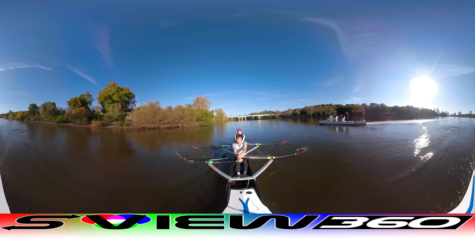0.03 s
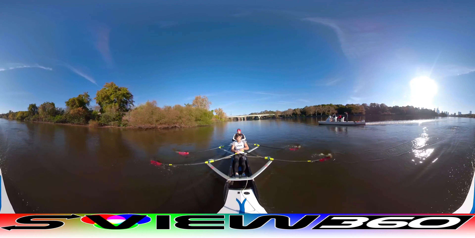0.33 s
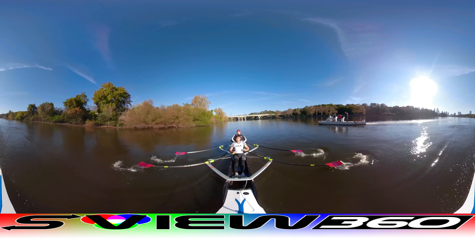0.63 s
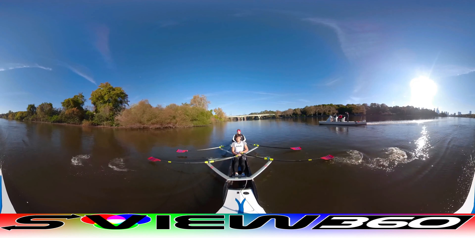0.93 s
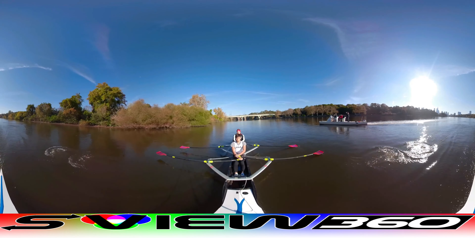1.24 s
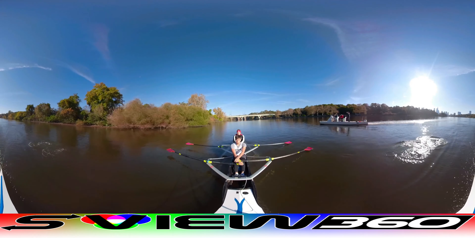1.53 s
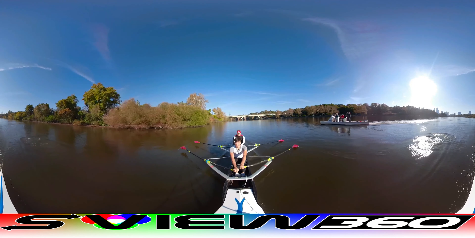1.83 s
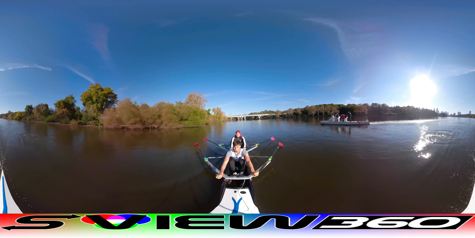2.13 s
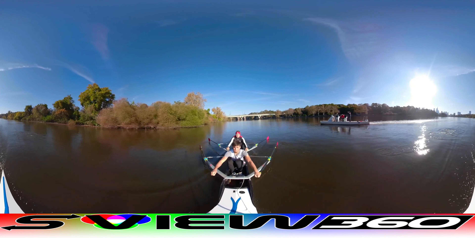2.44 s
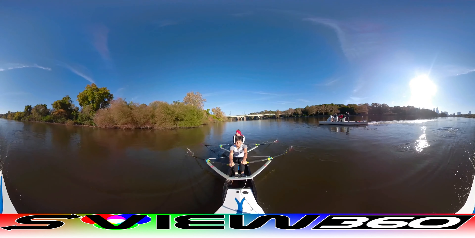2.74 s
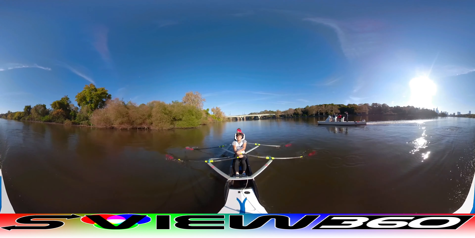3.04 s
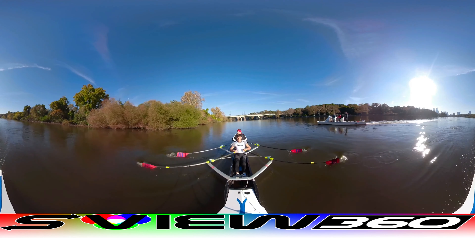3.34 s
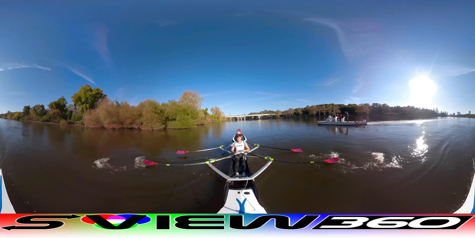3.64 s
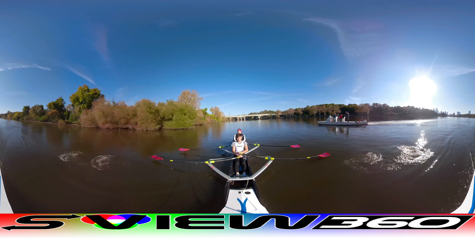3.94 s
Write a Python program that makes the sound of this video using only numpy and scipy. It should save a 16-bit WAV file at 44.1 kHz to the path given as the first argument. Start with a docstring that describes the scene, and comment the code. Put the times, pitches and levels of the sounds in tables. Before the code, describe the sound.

Oars splashing in calm water as a rowing boat glides, with wind rumbling on the microphone.

```python
"""A sculling boat on calm water, heard from its deck. First the blades splash out of the water and
leave fizzing foam. Then the boat glides: drops fall from the blades, and water washes and glugs along
the hull. Near 2.7 s the blades splash in, and about a second later they come out again. All along,
moving air rumbles and thumps on the microphone, at times overloading it."""
import sys
import numpy as np
from scipy import signal
from scipy.fft import rfft, irfft
from scipy.io import wavfile
from scipy.ndimage import uniform_filter1d

SR = 44100
rng = np.random.default_rng(int(sys.argv[2]) if len(sys.argv) > 2 else 0)


def store_wav(level_fs):
    """Save 16-bit WAV to argv[1]."""
    pcm = np.round(np.clip(np.atleast_2d(level_fs), -1, 1) * 32767)
    wavfile.write(sys.argv[1], SR, pcm.T.astype(np.int16))


N = 176400
TIME = np.arange(N) / SR


# The bright tone of spray, also used for drops, foam and mist: (frequency [Hz], level [dB])
SPRAY_TONE = [(700, -23.5), (2300, 2), (4100, -4.5), (5600, 3), (6400, -2.5), (7400, -2), (8700, -17),
              (10400, -8.5), (12200, -13.5), (15500, -23)]
# The darker tone of sloshing water: (frequency [Hz], level [dB])
SLOSH_TONE = [(400, 10.5), (2400, -6), (3500, -12), (12000, -28)]
# Splashes from the blades: (time [s], level [dB], fade time [s], slosh compared with spray [dB])
BLADE_SPLASHES = [(.516, -47, .018, 5), (.686, -29, 0.013, -5), (0.701, -42.5, 0.017, 13),
                  (0.737, -36.5, 0.021, 4), (0.761, -24.5, 0.019, -3), (.806, -35, 0.018, -6),
                  (2.541, -42, 0.009, 16), (2.641, -37.5, 0.014, -3), (2.663, -34, 0.008, -2),
                  (2.676, -34, 0.014, -3), (2.691, -27.5, 0.005, -3), (2.72, -24.5, 0.0026, -3),
                  (3.519, -40, 0.012, -5), (3.571, -31.5, 0.0058, -7), (3.587, -39, 0.011, 12),
                  (3.642, -34.5, 0.021, -8)]

def splashes():
    """Water thrown by the blades lands as a bright, grainy burst with a slosh of larger bubbles."""
    spray_gain, slosh_gain = np.zeros((2, N))
    for start, db, fade_s, slosh_db in BLADE_SPLASHES:
        landing = from_db(db) * burst(start, rise_s=0.39 * fade_s, fade_s=fade_s)
        spray_gain += landing
        slosh_gain += landing * from_db(slosh_db)
    grain = rng.standard_normal(N) * from_db(3.5 * drift(rate_hz=352))
    slosh = bubbles(per_s=2200, spread_db=1.0, cycles=47, pitches_hz=np.geomspace(350, 4000, 36))
    patter = colour(grain, SPRAY_TONE)
    brighter = colour(patter, [(8500, 0), (10500, 3.5)])  # more of the finest spray
    blades_entering = abs(TIME - 2.68) < 0.1
    patter = np.where(blades_entering, brighter, patter)
    return spray_gain * patter + slosh_gain * colour(slosh, SLOSH_TONE)


# Drops falling from the blades: (time [s], patter level [dB], bubble pitch [Hz])
BLADE_DROPS = [(0.301, -45, 5520), (0.377, -47.5, 5340), (1.173, -47, 3130), (1.289, -40.5, 4910),
               (1.4, -44.5, 2520), (1.461, -43.5, 5860), (1.737, -45, 5700), (1.757, -40, 3460),
               (1.79, -47.5, 5600)]

def drops():
    """Each drop patters on the water and stirs up a bubble that rings at a wobbly pitch."""
    patter, out = noise(SPRAY_TONE), np.zeros(N)
    wobble = 1 + 0.05 * drift(rate_hz=600)
    for start, db, hz in BLADE_DROPS:
        impact = patter * burst(start, rise_s=0.001, fade_s=0.01)
        ring = sine(hz * wobble) * burst(start, rise_s=0.001, fade_s=24 / hz)
        out += from_db(db) * (impact + from_db(7) * ring)
    return out


# The tone of water along the hull: (frequency [Hz], level [dB])
WASH_TONE = [(150, -24), (420, 5), (1400, 2), (2800, -15.5), (12000, -47)]
# How loud that water is: (time [s], level [dB])
WASH_LEVELS = [(.06, -46.5), (.47, -46.5), (.69, -38.5), (1.0, -47.5), (1.65, -43), (2.45, -40.5),
               (3.02, -49.5), (3.42, -50), (3.65, -41), (4.0, -55)]

def wash():
    """Water rushes along the hull, growing louder as the boat glides between strokes."""
    return level(WASH_LEVELS) * noise(WASH_TONE) * from_db(drift(rate_hz=40))


# Hollow glugs under the hull: (time of the peak [s], level [dB], pitch [Hz])
HULL_GLUGS = [(.54, -22, 166), (.966, -9, 152.3), (1.25, -17, 157.4), (1.835, -14.5, 180),
              (1.96, -19.5, 171.5), (2.06, -20, 191.9), (2.215, -18.5, 178.7), (2.35, -17, 185.8)]

def glugs():
    """Pockets of air trapped under the hull ring at a low, wobbly pitch."""
    wobble, out = 1 + 0.16 * drift(rate_hz=91.3), np.zeros(N)
    for peak_s, db, hz in HULL_GLUGS:
        ring = np.sqrt(2) * sine(hz * wobble)  # average level (rms) of 1
        out += from_db(db) * hump(peak_s, half_width_s=0.02) * ring
    return out


# How loud the foam is; the trickle follows it too: (time [s], level [dB])
FOAM_LEVELS = [(.06, -53), (.47, -59.5), (.56, -51), (.78, -47.5), (1.02, -55.5), (1.12, -58), (2.0, -57),
               (2.3, -54.5), (2.72, -54.5), (2.96, -61), (3.28, -64.5), (3.46, -55.5), (3.6, -48.5),
               (3.77, -50), (3.97, -64.5)]

def foam():
    """Many tiny bubbles crackle over a fine hiss."""
    fizz = bubbles(per_s=1500, spread_db=6, cycles=9, pitches_hz=np.geomspace(1800, 14000, 28))
    crackle = from_db(-1.5) * colour(fizz, SPRAY_TONE)
    hiss = from_db(-1) * noise(SPRAY_TONE)
    return level(FOAM_LEVELS) * (crackle + hiss)


def trickle():
    """Stray droplets tick on the water among the foam."""
    ticks = bubbles(per_s=42, spread_db=2.6, cycles=65, pitches_hz=np.geomspace(4900, 6700, 11))
    return from_db(-7) * level(FOAM_LEVELS) * ticks


# Swells of the finest fizz: (time of the peak [s], half width [s], level [dB])
MIST_SWELLS = [(.97, 0.15, -59.5), (2.3, 0.38, -60.5), (3.78, 0.11, -62)]

def mist():
    """The smallest bubbles make a very high sizzle that slowly comes and goes."""
    highs_only = signal.butter(2, 10000, "high", fs=SR, output="sos")
    sizzle = rms_one(signal.sosfiltfilt(highs_only, noise(SPRAY_TONE)))
    swells = sum(from_db(db) * hump(peak_s, half_width_s) for peak_s, half_width_s, db in MIST_SWELLS)
    return sizzle * swells


# The tones of a gust's deep push, middle and rough top, each: (frequency [Hz], level [dB])
GUST_DEEP_TONE = [(25, 2.5), (75, 8.5), (180, -27), (500, -85)]
GUST_MIDDLE_TONE = [(45, -41), (110, 3), (190, 1), (330, -19.5), (1200, -85)]
GUST_TOP_TONE = [(150, -33.5), (300, 1), (480, -10), (1200, -41), (6000, -96)]
# Short gusts of air: (time of the peak [s], half width [s], level of the middle [dB],
# deep push compared with middle [dB], top compared with middle [dB])
GUSTS = [(0.325, 0.04, -22.5, -4.5, -23), (0.7, 0.013, -19, 1, -7.5), (0.756, 0.026, -12, -8, -19),
         (0.814, 0.013, -15, -0.5, -19), (1.357, 0.02, -17.5, 2.5, -16.5), (2.452, 0.0096, -12.5, -3, -28),
         (2.556, 0.032, -17.5, 2.5, -13), (2.744, 0.0096, -12, -1, -22), (2.814, 0.021, -8, 1.5, -16.5),
         (2.9, 0.012, -11.5, -1, -20), (2.952, 0.02, -10.5, -2.5, -7.5), (3.668, 0.023, -14, -9, -15.5),
         (3.903, 0.0047, -4.5, -12, -17.5), (3.925, 0.0084, -4.5, -3, -23)]

def gusts():
    """Small swirls of air thump the microphone, each with its own mix of deep push and rough top."""
    deep_gain, middle_gain, top_gain = np.zeros((3, N))
    for peak_s, half_width_s, db, deep_db, top_db in GUSTS:
        swell = from_db(db) * hump(peak_s, half_width_s)
        middle_gain += swell
        deep_gain += swell * from_db(deep_db)
        top_gain += swell * from_db(top_db)
    deep = deep_gain * steadied(noise(GUST_DEEP_TONE), span_s=0.016)
    middle = middle_gain * steadied(noise(GUST_MIDDLE_TONE), span_s=0.028)
    top = top_gain * steadied(noise(GUST_TOP_TONE), span_s=0.019)
    return deep + middle + top


# The low tone of the wind: (frequency [Hz], level [dB])
WIND_TONE = [(45, 1), (170, 2), (225, -2), (370, -19), (800, -45.5), (1600, -63)]
# How loud the wind is: (time [s], level [dB])
WIND_LEVELS = [(.44, -31), (.75, -21), (1.2, -21), (1.52, -25.5), (1.77, -20.5), (2.2, -24), (2.5, -16.5),
               (2.66, -20.5), (3.02, -22.5), (3.2, -31), (3.43, -30.5), (3.55, -18), (3.8, -17),
               (4.0, -25.5)]

def wind():
    """Air flowing past the microphone makes a lumpy rumble."""
    rumble = steadied(noise(WIND_TONE), span_s=0.044)
    return level(WIND_LEVELS) * rumble * from_db(0.74 * drift(rate_hz=62))


def bubbles(per_s, spread_db, cycles, pitches_hz):
    """Bubbles form at random; each rings at one pitch and fades by 60 dB over the given cycles."""
    strengths = from_db(spread_db * np.minimum(rng.exponential(1, N), 4))
    signs = rng.choice([-1, 1], N)
    clicks = strengths * signs * (rng.random(N) < per_s / SR)
    which_pitch, out = rng.integers(0, len(pitches_hz), N), 0
    for k, hz in enumerate(pitches_hz):
        decay, angle = from_db(-60 * hz / (cycles * SR)), 2 * np.pi * hz / SR  # per sample
        ringing = [1, -2 * decay * np.cos(angle), decay * decay]  # this filter makes a click ring
        out += hz * signal.lfilter([1, 0, -1], ringing, clicks * (which_pitch == k) + 1e-18)
    return rms_one(out)


def from_db(db):
    """Turn decibels into a gain, the number a sound is multiplied by."""
    return 10 ** (np.asarray(db) / 20)


def rms_one(x):
    """Scale a sound to an average level (rms) of 1."""
    return x / np.sqrt(np.mean(x ** 2) + 1e-20)


def level(rows):
    """Join (time [s], level [dB]) points into a gain for every sample."""
    return from_db(np.interp(TIME, *np.transpose(rows)))


def colour(x, tone):
    """Shape a sound's lows and highs by a tone table, at an average level of 1."""
    hz, db = np.transpose(tone)
    frequencies = np.maximum(np.arange(N // 2 + 1) * SR / N, 1)
    gains = from_db(np.interp(np.log(frequencies), np.log(hz), db))
    return rms_one(irfft(rfft(x) * gains, N))


def noise(tone):
    """A steady rush with the given tone."""
    return colour(rng.standard_normal(N), tone)


def sine(hz):
    """A pure note that follows a changing pitch."""
    return np.sin(2 * np.pi * np.cumsum(hz) / SR)


def drift(rate_hz):
    """A random wander of about 1 either way; a higher rate wanders faster."""
    frequencies = np.arange(N // 2 + 1) * SR / N
    return rms_one(irfft(rfft(rng.standard_normal(N)) / (1 + (frequencies / rate_hz) ** 2), N))


def steadied(x, span_s):
    """Even out swells that last longer than the span."""
    size = max(int(span_s * SR), 2)
    power = uniform_filter1d(uniform_filter1d(x ** 2, size), size)
    return x / np.sqrt(power + 1e-9)


def burst(start, rise_s, fade_s):
    """Rise straight to 1, then fall to about a third every fade_s."""
    age = TIME - start
    return np.clip(age / rise_s, 0, 1) * np.exp(-np.clip((age - rise_s) / fade_s, 0, 50))


def hump(peak_s, half_width_s):
    """A smooth, bell-shaped swell to 1 and back."""
    return np.exp(-np.minimum(((TIME - peak_s) / half_width_s) ** 2, 80) / 2)


def scene():
    """Air and water add up in one channel."""
    return (wind() + gusts() + wash() + glugs() + foam() + mist() + trickle() + splashes() + drops())[None]


def record(dry):
    """The sound starts suddenly, loses its deepest bass, overloads in big gusts and loses its very top."""
    bass_cut = signal.butter(1, 12, "high", fs=SR, output="sos")
    treble_cut = signal.cheby2(16, 50, 16150, fs=SR, output="sos")
    heard = signal.sosfilt(bass_cut, dry * (TIME > 0.06))
    return signal.sosfiltfilt(treble_cut, np.clip(heard, -1, 1))


dry = scene()
out = record(dry)
store_wav(out)
```